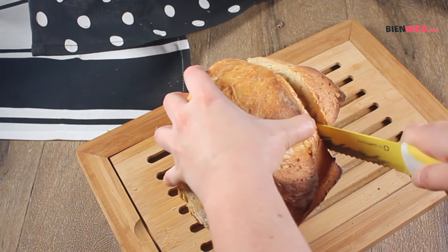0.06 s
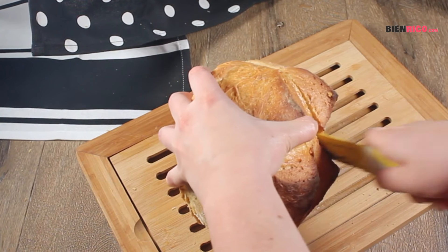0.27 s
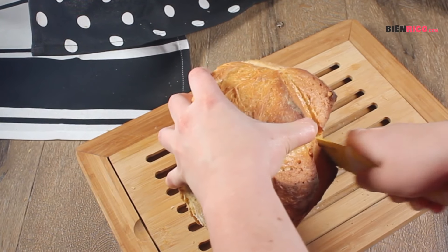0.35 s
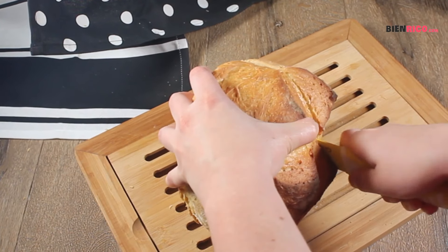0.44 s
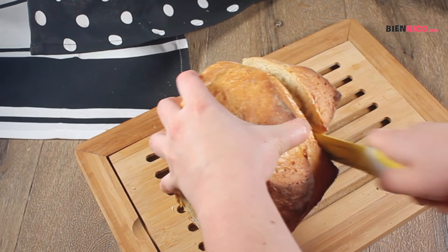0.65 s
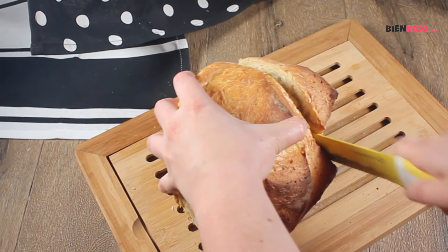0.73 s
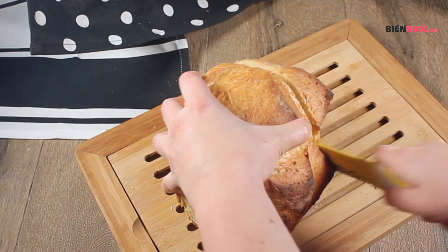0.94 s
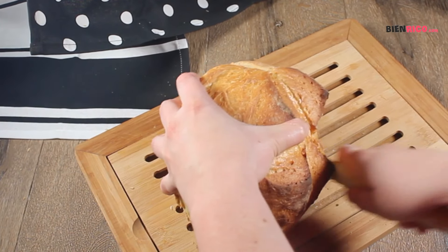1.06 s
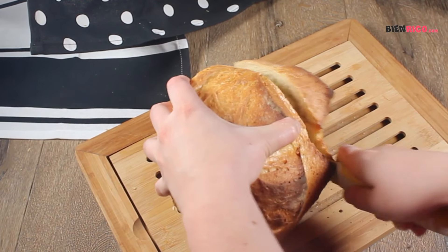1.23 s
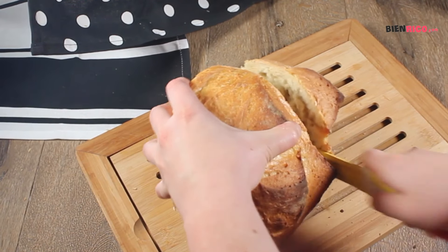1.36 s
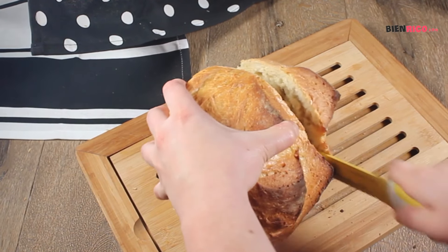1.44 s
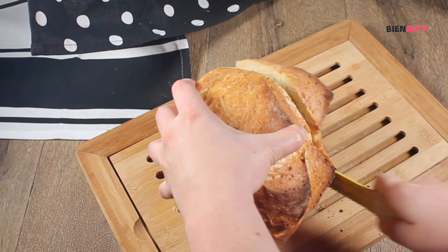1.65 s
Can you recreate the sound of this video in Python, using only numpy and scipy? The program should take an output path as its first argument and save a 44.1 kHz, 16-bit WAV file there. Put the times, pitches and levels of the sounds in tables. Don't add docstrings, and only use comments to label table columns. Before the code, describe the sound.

Close up in a small kitchen, bread crust crunches under a sawing knife; teeth catch with dull woody knocks, crust snaps brightly, slats hum briefly, and the strokes fade into faint crackles and quiet room noise.

```python
import sys
import numpy as np
from scipy import signal
from scipy.fft import rfft, irfft
from scipy.io import wavfile
from scipy.ndimage import uniform_filter1d

SR = 44100
rng = np.random.default_rng(int(sys.argv[2]) if len(sys.argv) > 2 else 0)


def elevation(decibels):
    levels = np.asarray(decibels, float)
    return 10 ** (levels / 20)


def master_out(mix):
    frames = np.transpose(np.atleast_2d(mix))
    ceiling = np.clip(frames, -1, 1)
    pcm = np.round(ceiling * 32767).astype(np.int16)
    wavfile.write(sys.argv[1], SR, pcm)


N = 74970

# time in seconds, blade pressure as a level in dB,
# then crumbling crust and blade rubbing on crumb, both in dB relative to the pressure.
STROKES = [(0, -32.5, -6.5, 1), (0.222, -53, -9, 6.5), (.245, -39.5, 7.5, -36), (.34, -25, -9.5, 0),
           (0.471, -19.5, -8, -5), (0.567, -36.5, -9, 0.5), (0.637, -51, 7, 13), (0.666, -30.5, -19, 8),
           (.82, -36, -7, -3), (0.917, -45, -9, -7), (1.03, -20.5, -7.5, -10), (1.197, -22.5, -7, 2.5),
           (1.3, -39.5, -4.5, 0), (1.338, -29.5, -12, -10), (1.44, -41, -4.5, 4), (1.499, -36, -1.5, 1.5),
           (1.6, -44.5, -7, 0.5), (1.7, -41.5, 0.5, -25)]
# start in seconds, peak in dB, centre pitch in Hz, length in ms.
CRUST_SNAPS = [(.152, -36, 8700, .7), (0.206, -32.5, 3000, 2.4), (0.237, -23, 6000, .5),
               (0.2381, -8.5, 6560, 1.6), (.24, -9, 5200, 3.2), (0.325, -9, 12400, 0.32),
               (0.348, -11, 7060, 2.6), (0.3465, -9.5, 2970, 2.6), (0.353, -17, 8000, 0.27),
               (.3964, -14, 7600, 0.67), (0.4096, -15, 8500, .6), (.4124, -11, 6860, 3),
               (.457, -31, 7000, 3), (.4725, -20, 7000, 4.8), (0.4773, -3.5, 3370, 2.2),
               (0.48, -10.5, 5040, 5.5), (.637, -24.5, 7950, 0.81), (0.6534, -20.5, 4600, 3.2),
               (0.7165, -17.5, 7000, 0.46), (0.769, -19, 6900, 7.5), (0.785, -22, 7400, 4.2),
               (0.816, -26, 8040, 2.8), (0.838, -23.5, 2880, 2.3), (0.922, -29, 9000, .3),
               (.93, -29, 8950, 2), (0.94, -29, 10600, .3), (0.945, -30, 9000, .5), (.9545, -31, 7900, 1),
               (0.961, -21, 5570, 0.65), (.9642, -20, 9000, 0.69), (0.985, -19.5, 5860, 20),
               (1.034, -16, 8950, 3.9), (1.05, -16, 7400, 2.7), (1.062, -13.5, 7850, .8),
               (1.069, -16, 4000, 3), (1.1015, -11.5, 2880, 2.9), (1.129, -5.5, 2480, 2.6),
               (1.14, -10, 2960, 7.9), (1.1753, -6.5, 8400, 1.2), (1.176, -5, 5700, 2.1),
               (1.2147, -6.5, 3100, 4), (1.215, -25, 8700, 1.3), (1.3295, -14.5, 5600, 2.96),
               (1.421, -26, 2900, 2.5), (1.482, -25, 2420, 3.5), (1.496, -23, 2750, 5.9),
               (1.515, -25, 2800, 5.4), (1.6187, -18.5, 6860, 4.3), (1.6195, -25, 2140, 3.6),
               (1.686, -29, 10600, .3)]
# start in seconds, peak in dB, contact time in ms,
# pitch of the slat it rings in Hz, level of that ring in dB.
TOOTH_CATCHES = [(.2385, -18, 0.085, 920, -32), (0.2751, -38, 0.45, 1270, -22.5),
                 (.299, -17, 0.6, 517, -25), (.3385, -12.5, 0.74, 301, -19.5), (.458, -5, 0.19, 552, -18),
                 (0.4614, 0.5, 0.22, 770, -16.5), (0.4745, -2, 0.25, 318, -14),
                 (.4775, -5.5, 0.38, 577, -22), (0.6577, -5, 0.08, 565, -18.5),
                 (0.6628, -7, 0.14, 935, -17), (.666, -30, 0.17, 1920, -18.5), (.699, -22, 0.32, 720, -23),
                 (.7245, -17, 0.27, 480, -42), (.7325, -11, 0.24, 402, -28.5), (0.838, -11, 0.19, 574, -28),
                 (0.962, -11, 0.19, 420, -24.5), (1.032, -3, 0.5, 430, -17.5), (1.051, 2, 0.3, 477, -30),
                 (1.115, -2, 0.29, 530, -32), (1.129, -22, 0.2, 840, -8), (1.134, -14, 0.33, 570, -24),
                 (1.1415, 3, 0.22, 584, -14), (1.154, -28, 0.35, 408, -13), (1.183, -4, 1, 408, -15),
                 (1.194, -9, 0.58, 308, -19.5), (1.2074, -12, 1, 489, -15.5), (1.322, -6, 0.24, 422, -24),
                 (1.328, -10, 0.25, 590, -26), (1.339, -18, 0.14, 713, -23), (1.381, -14, 0.16, 720, -23.5),
                 (1.69, -23, 0.5, 360, -32)]
BOARD_PITCHES_HZ = [140, 175, 293, 344, 411, 480, 556, 655, 712, 818, 877, 1072, 1199, 1500]
# strength in dB, time to fade by 60 dB in seconds.
BOARD_RINGS = [(-46.5, .2), (-47.5, .2), (-34, 0.26), (-48, 0.48), (-35.5, 0.25), (-49, 0.21), (-30, 0.028),
               (-39.5, 0.074), (-35, 0.2), (-31, 0.013), (-73, 0.11), (-47, 0.042), (-38.5, 0.063),
               (-39, 0.059)]
# start in seconds, pitch in Hz, level in dB, length in seconds.
SLAT_HUMS = [(.03, 180, -42, .12), (.3, 172, -30, .07), (.49, 341, -24, .04), (.53, 341, -30, .1),
             (.15, 62, -46, .35), (.958, 1200, -31, .03), (1.02, 295, -24, .04), (1.07, 293, -25, .03),
             (1.115, 293, -23, .04), (1.225, 294, -23, .075), (1.195, 140, -24, .04), (1.31, 295, -28, .04),
             (1.345, 100, -42, .14), (.26, 178, -38, .04), (.5, 180, -37, .06), (.99, 150, -34, .04),
             (1.46, 265, -39, .05)]
# start in seconds, peak in dB.
FLAKE_POPS = [
    (.3372, -4),
    (1.2068, -4.5),
    (1.21, -9),
]
# frequency in Hz, level in dB per Hz.
LOAF_TONE = [(90, -14.5), (140, -4.5), (222, -16), (280, 1), (550, -9), (1000, -4), (2000, -19.5),
             (4000, -26)]
# frequency in Hz, level in dB per Hz.
CRUST_TONE = [(900, -21), (1700, -6), (2900, -1), (4300, -5), (5500, -6), (8800, -7.5), (12000, -17),
              (15500, -17)]
# frequency in Hz, level in dB per Hz.
HUSH_TONE = [(18, -41), (30, -23), (192, 14), (443, -25), (921, 15), (996, -29), (4910, 2), (10200, -18),
             (15500, -46)]

LOAF_LOW_HZ = 115


def rms1(x):
    return x / np.sqrt(np.mean(x ** 2))


def colour(x, points, size=8192):
    hz, db = np.array(points, float).T
    f = np.arange(size // 2 + 1) * SR / size + 1
    log_gain = np.interp(np.log(f), np.log(hz), db) * np.log(10) / 20
    cepstrum = irfft(log_gain)
    cepstrum[1:size // 2] *= 2
    cepstrum[size // 2 + 1:] = 0
    response = irfft(np.exp(rfft(cepstrum)))
    return signal.fftconvolve(x, response)[:len(x)]


def walk(rate_hz):
    hold = max(int(SR / rate_hz), 2)
    steps = rng.standard_normal(N)[np.arange(N) // hold]
    return rms1(uniform_filter1d(steps, hold // 2 + 1))


def clicks(per_s, spread_db):
    chance, sign, size = rng.random((3, N))
    happens = chance < per_s / SR
    return happens * np.sign(sign - .5) * elevation(-spread_db * np.log(size + .02))


def kitchen_hush():
    return elevation(-49.5) * rms1(colour(rng.standard_normal(N), HUSH_TONE))


def rumble(pressure_db):
    pitch_hz, follows = 130, 0.41
    low = signal.lfilter(*signal.iirpeak(pitch_hz, 1.2, SR), rng.standard_normal(N))
    low = signal.lfilter(*signal.butter(2, [LOAF_LOW_HZ, 2 * pitch_hz], "band", fs=SR), low)
    level_db = -48 + follows * (pressure_db - pressure_db.mean()) + 2 * walk(9.6)
    return rms1(low) * elevation(level_db)


def room(dry):
    t60_s, top_hz, first_echo_s = .4, 6000, .004
    t = np.arange(SR // 3) / SR
    tail = rng.standard_normal(len(t)) * 1000. ** (-t / t60_s) * (t > first_echo_s)
    tail = signal.lfilter(*signal.butter(1, [450, top_hz], "band", fs=SR), tail)
    tail = tail / np.sqrt(np.sum(tail ** 2))
    return elevation(-12.5) * signal.fftconvolve(dry, tail)[:N]


def board(x):
    longest_ring_s = .17
    t = np.arange(SR // 3)[:, None] / SR
    db, t60 = np.array(BOARD_RINGS).T
    t60 = np.minimum(t60, longest_ring_s)
    swing = np.sin(2 * np.pi * np.array(BOARD_PITCHES_HZ) * t)
    ring = np.sum(elevation(db) * swing * 1000. ** (-t / t60) / np.sqrt(t60), axis=1)
    return signal.fftconvolve(x, ring / np.sqrt(np.sum(ring ** 2)))[:N]


def slat_hums():
    rise_s, fade_db = .006, -4
    out = np.zeros(N)
    for s, hz, db, length in SLAT_HUMS:
        t = np.maximum(np.arange(N) / SR - s, 0)
        swell = 1 - np.exp(-t / rise_s)
        damping = np.exp(-(t / length) ** 6)
        out += swell * elevation(db + fade_db * t / length) * damping * np.sin(2 * np.pi * hz * t)
    return out


def flake_pops():
    pop_ms = .09
    u = np.arange(64) / SR * 1000 / pop_ms
    out = np.zeros(N)
    for s, db in FLAKE_POPS:
        i = int(s * SR)
        out[i:i + 64] += elevation(db) * np.e * u * np.exp(-u)
    return signal.lfilter(*signal.butter(1, 400, "high", fs=SR), out)


def tooth_catches():
    ring_cycles = 29.2
    n = SR // 4
    t = np.arange(n) / SR
    push, ring = np.zeros(N + n), np.zeros(N + n)
    for s, db, contact_ms, hz, ring_db in TOOTH_CATCHES:
        i = int(s * SR)
        u = t * 1000 / contact_ms
        push[i:i + n] += elevation(db - 13.5) * (np.e * u * np.exp(-u * 2) * 2) ** 2
        ring[i:i + n] += elevation(ring_db) * np.sin(2 * np.pi * hz * t) * 1000. ** (-t * hz / ring_cycles)
    push = signal.lfilter(*signal.butter(2, 270, "high", fs=SR), push[:N])
    return push + ring[:N] + elevation(-12) * 4 * board(push)


def crust_snaps():
    pitch_width, tail_lengths = 0.66, 4.8
    broad_db, tail_db, grain_db = -1, -10, 4
    n = 4096
    ms = np.arange(n) / SR * 1000
    out = np.zeros(N + n)
    for s, db, hz, length_ms in CRUST_SNAPS:
        cracks, grain = rng.standard_normal((2, n))
        flakes = elevation(tail_db) * np.exp(-ms / (tail_lengths * length_ms))
        shape = np.exp(-(ms / length_ms) ** 4) + flakes
        burst = cracks * elevation(grain_db * np.repeat(grain, 8)[:n]) * shape
        b, a = signal.iirpeak(hz, 1 / pitch_width, SR)
        pitched = signal.lfilter(b, a, signal.lfilter(b, a, burst))
        snap = elevation(broad_db) * rms1(colour(burst, CRUST_TONE, size=512)) + rms1(pitched)
        i = int(s * SR)
        out[i:i + n] += elevation(db) * snap / np.abs(snap).max()
    return out[:N]


def blade_slide(force):
    rub = clicks(5000, 2) * elevation(1.5 * walk(50))
    b, a = signal.iirpeak(1444, 1 / 1.18, SR)
    return force * rms1(signal.lfilter(b, a, signal.lfilter(b, a, rub)))


def crumbs(force):
    per_s, spread_db, crumb_ms = 4500, 2.6, .6
    patch_hz, patch_db = 60, 1.2
    fall = np.exp(-np.arange(400) / (crumb_ms * SR / 1000))
    strength = signal.fftconvolve(np.abs(clicks(per_s, spread_db)), fall)[:N]
    spit = strength * rng.standard_normal(N) * elevation(patch_db * walk(patch_hz))
    return elevation(2.5) * force * rms1(colour(spit, CRUST_TONE))


def teeth(pressure):
    per_s, spread_db = 2200, 2.2
    judder_hz, judder_db = 110, 1.6
    board_db = 2
    slips = rms1(clicks(per_s, spread_db) * elevation(judder_db * walk(judder_hz))) * pressure
    impulse = np.zeros(8192)
    impulse[0] = 1
    loaf_strength = np.sqrt(np.sum(colour(impulse, LOAF_TONE) ** 2))
    thud = colour(slips, LOAF_TONE) / loaf_strength
    thud = signal.lfilter(*signal.butter(2, LOAF_LOW_HZ, "high", fs=SR), thud)
    return (thud + elevation(board_db) * board(slips)) / np.sqrt(1 + elevation(2 * board_db))


def scene():
    t = np.arange(N) / SR
    s, pressure_db, crust_db, slide_db = np.array(STROKES).T
    pressure_now_db = np.interp(t, s, pressure_db)
    crust_force = elevation(np.interp(t, s, pressure_db + crust_db))
    slide_force = elevation(np.interp(t, s, pressure_db + slide_db - 6.0))
    dry = teeth(elevation(pressure_now_db)) + crumbs(crust_force) + blade_slide(slide_force)
    dry = dry + crust_snaps() + tooth_catches() + flake_pops() + slat_hums()
    mix = dry + room(dry) + kitchen_hush() + rumble(pressure_now_db)
    return mix[None]


def roll_off(x):
    return signal.sosfilt(signal.butter(12, 15850, fs=SR, output="sos"), x)


def record(dry):
    no_bass = signal.butter(4, 65.3, "high", fs=SR, output="sos")
    soft_treble = signal.butter(3, 10620, fs=SR, output="sos")
    closed_top = signal.ellip(4, 1, 25, 14450, fs=SR, output="sos")
    mix = signal.sosfilt(no_bass, dry)
    mix = signal.sosfilt(soft_treble, mix)
    mix = signal.sosfilt(closed_top, mix)
    return roll_off(mix)


dry = scene()
out = record(dry)
master_out(out)
```